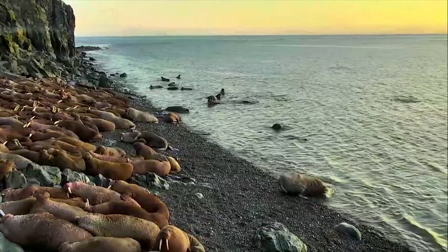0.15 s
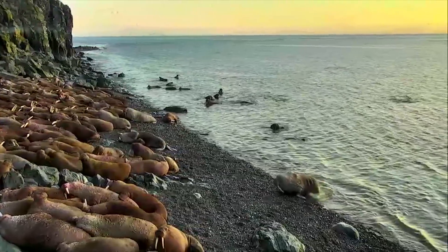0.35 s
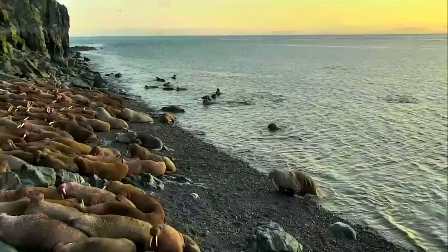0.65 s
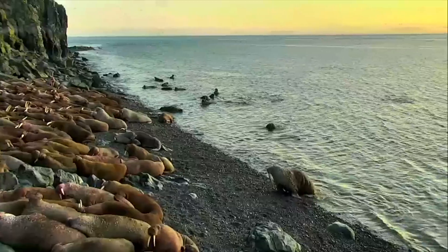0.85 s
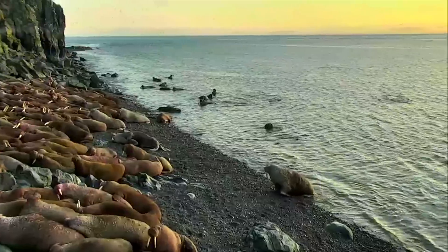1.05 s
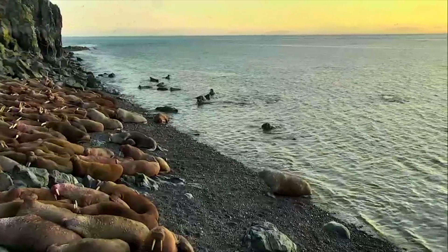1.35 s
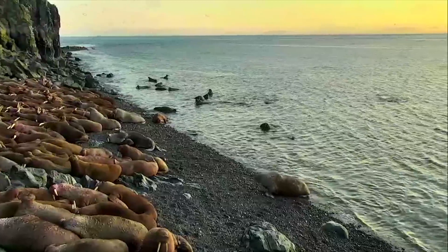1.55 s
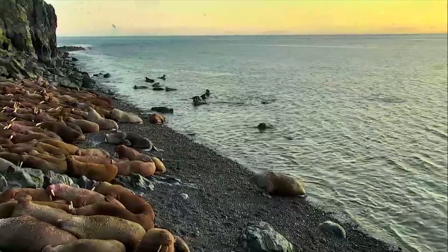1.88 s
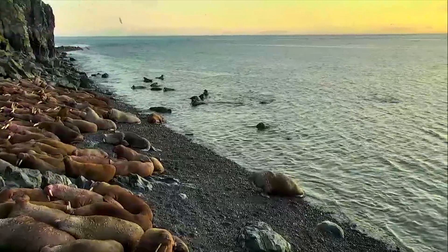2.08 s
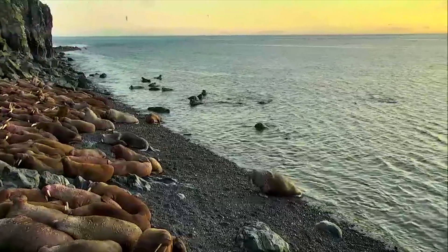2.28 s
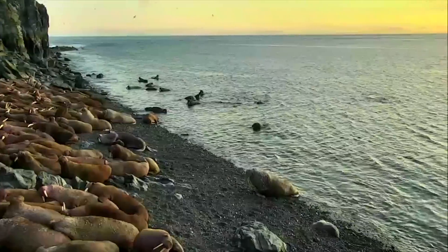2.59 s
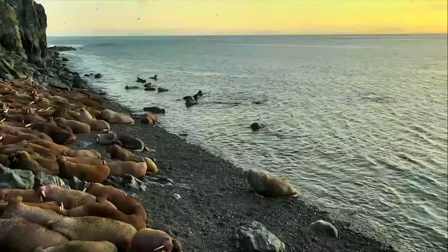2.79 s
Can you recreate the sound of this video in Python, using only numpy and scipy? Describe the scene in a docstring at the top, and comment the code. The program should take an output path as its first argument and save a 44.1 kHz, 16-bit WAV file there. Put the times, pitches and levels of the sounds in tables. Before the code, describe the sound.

A walrus gives a rough, throaty roar that clears into a falling note, then a wet fluttering snort and low grunts, echoing off a cliff, over small surf on pebbles and wind bumping the microphone.

```python
"""Small surf hisses on pebbles, with a short moan and the end of a hoarse far-off call, as wind bumps the microphone.
Then a walrus roars: rough vocal-fold pulses and puffs of air ring its throat, and one harmonic clears into a falling note.
A fluttering snort follows: spits of spray and pushes of air, with overload clicks, trailing off in a hollow rush.
Low fluttering grunts, a growl of slow puffs, blows of air and knocking pebbles fill the rest.
A cliff throws the calls back as scattered, decaying echoes."""
import sys
import numpy as np
from scipy import signal
from scipy.fft import rfft, irfft
from scipy.io import wavfile
from scipy.ndimage import uniform_filter1d

SR = 44100
rng = np.random.default_rng(int(sys.argv[2]) if len(sys.argv) > 2 else 0)


def output_pcm(signal):
    """Save a mono or channel-first signal as 16-bit PCM at the path in sys.argv[1].

    Samples are clipped to [-1, 1] before scaling.
    """
    pcm = np.clip(np.atleast_2d(signal).T, -1, 1) * 32767
    wavfile.write(sys.argv[1], SR, np.round(pcm).astype(np.int16))


N = 129213  # samples
T = np.arange(N) / SR  # s
BINS_HZ = np.fft.rfftfreq(N, 1 / SR)


def amp(db):
    """Decibels to gain."""
    return 10 ** (np.asarray(db) / 20)


def unit(x):
    """Scales to rms 1."""
    return x / np.sqrt(np.mean(x ** 2) + 1e-20)


def curve(points):
    """Straight lines through (t/s, value) points."""
    return np.interp(T, *np.transpose(points))


def level(points):
    """Gain from (t/s, level/dB) points, silent outside them."""
    return amp(np.interp(T, *np.transpose(points), left=-np.inf, right=-np.inf))


def read(points, hz):
    """Reads a (f/Hz, value) table on a log-frequency axis."""
    f, value = np.transpose(points)
    return np.interp(np.log(hz + 1), np.log(f), value)


def noise(spectrum):
    """Steady noise coloured by a (f/Hz, level/dB) table, at rms 1."""
    white = rfft(rng.standard_normal(N))
    return unit(irfft(white * amp(read(spectrum, BINS_HZ)), N))


def wobble(hz):
    """Random drift of rms 1 that moves no faster than about the given rate."""
    white = rfft(rng.standard_normal(N))
    return unit(irfft(white / (1 + (BINS_HZ / hz) ** 4), N))


def turns_of(hz):
    """Running count of cycles at a fixed or moving frequency."""
    return np.cumsum(hz) / SR


def resonate(x, hz, width):
    """A steep resonance of gain 1, fixed or moving: shift down to 0 Hz, smooth twice, shift back."""
    turn = np.exp(2j * np.pi * turns_of(hz * np.ones(N)))
    r = np.exp(-np.pi * width / SR)
    smooth = signal.lfilter([(1 - r) ** 2], [1, -2 * r, r * r], x / turn + 1e-18)
    return 2 * (turn * smooth).real


def tract(x, resonances):
    """Rings a sound through parallel (f/Hz, width/Hz, level/dB) resonances of alternating sign, at rms 1."""
    return unit(sum((-1) ** k * amp(db) * resonate(x, f, width)
                    for k, (f, width, db) in enumerate(resonances)))


def swell(s, rise, fall):
    """A bell-shaped rise and fall that peaks at one moment."""
    return np.exp(-.5 * ((T - s) / np.where(T < s, rise, fall)) ** 2)


# colour of the wind rumble: f/Hz, level/dB
WIND_COLOUR = [(10, -19), (25, 5), (45, 4), (70, 11), (115, 3), (170, 1.5), (300, -23.5), (1000, -67.5)]
# gusts bumping the microphone: peak t/s, rise/s, fall/s, level/dB
WIND_GUSTS = [(.93, 0.02, 0.14, -39.5), (1.33, 0.08, 0.12, -33), (2.034, 0.014, 0.017, -36),
              (2.16, 0.061, 0.072, -34), (2.84, 0.027, 0.032, -41)]
WIND_BED_DB = -49


def wind():
    """Low lumps of air push on the microphone, over a faint steady rumble."""
    gusts = sum(amp(db) * swell(s, rise, fall) for s, rise, fall, db in WIND_GUSTS)
    return noise(WIND_COLOUR) * (amp(WIND_BED_DB) + gusts)


# colour laid on the wash: f/Hz, level/dB
SURF_COLOUR = [(59, -28), (100, -3), (146, 1.5), (215, -6.5), (380, -7), (772, -18), (1300, -12.5),
               (1650, -16), (2200, -8), (3900, -13.5), (5100, -36.5), (10500, -73)]
# ebb and flow of the wash: t/s, level/dB
SURF_LEVEL = [(0, -35.5), (.6, -32), (1, -35.5), (1.5, -31.5), (2.35, -35.5), (2.93, -34)]
GRAINS_PER_S, PATCH_DB = 1500, 1.5


def surf(size=512):
    """Patchy wash: noise plus random grains of rolling pebbles and droplets, uneven over time and pitch."""
    struck = rng.random(N) < GRAINS_PER_S / SR
    grains = amp(3.1 * np.minimum(rng.exponential(1, N), 4)) * rng.standard_normal(N) * struck
    _, _, z = signal.stft(rng.standard_normal(N) + 0.57 * unit(grains), SR, nperseg=size)
    across_pitch = uniform_filter1d(rng.standard_normal(z.shape), size=6, axis=0)
    patches = unit(uniform_filter1d(across_pitch, size=8, axis=1))
    wash = signal.istft(z * amp(PATCH_DB * patches), SR, nperseg=size)[1][:N]
    low_cut = BINS_HZ ** 2 / (BINS_HZ ** 2 + 70 ** 2)
    return level(SURF_LEVEL) * unit(irfft(rfft(wash) * amp(read(SURF_COLOUR, BINS_HZ)) * low_cut, N))


# time each band of the echo takes to drop 60 dB: f/Hz, decay/s
CLIFF_DECAY = [(100, 0.56), (500, 1), (2000, 0.5), (6000, .3)]
CLIFF_DB = -11.5
ECHOES_PER_S, CLIFF_BUILD_S = 2000, 0.0064


def cliff(x, size=256):
    """Scattered echoes from the rock, each band dying at its own speed."""
    echoes = rng.standard_normal(SR) * (rng.random(SR) < ECHOES_PER_S / SR)
    hz, t, z = signal.stft(echoes, SR, nperseg=size)
    decay = np.exp(-np.log(1000) * t / read(CLIFF_DECAY, hz)[:, None])
    tail = signal.istft(z * decay * np.minimum(t / CLIFF_BUILD_S, 1), SR, nperseg=size)[1]
    return signal.fftconvolve(x, tail / np.linalg.norm(tail))[:N]


# hoarse voices of the distant herd: start t/s, length/s, f/Hz, width/Hz, level/dB
HERD_CALLS = [(-.3, 0.49, 392, 50, -42.5), (1.504, 1.18, 405.5, 40, -45), (2.16, 0.11, 3450, 350, -44)]


def herd():
    """Distant hoarse calls swell and fade, each as breath noise in one resonance."""
    out = np.zeros(N)
    for s, length, hz, width, db in HERD_CALLS:
        arch = np.sqrt(abs(np.sin(np.pi * np.clip((T - s) / length, 0, 1))))
        out += amp(db) * arch * unit(resonate(rng.standard_normal(N), hz, width))
    return out


# short clear moans from farther back: peak t/s, rise/s, fall/s, f/Hz at the peak, glide/(Hz per s), level/dB
HERD_MOANS = [(0.029, 0.031, 0.029, 234, 1, -42), (.965, 0.029, 0.044, 418, -180, -33.5),
              (1.63, 0.047, 0.022, 345, 704, -37.5)]


def moans():
    """Smooth gliding voices of farther animals, as slightly unsteady sines."""
    out = np.zeros(N)
    for s, rise, fall, hz, glide, db in HERD_MOANS:
        pitch = (hz + glide * (T - s)) * (1 + 0.021 * wobble(55))
        out += amp(db) * swell(s, rise, fall) * unit(np.sin(2 * np.pi * turns_of(pitch)))
    return out


# pebbles knocking under the animals: peak t/s, f/Hz, level/dB
PEBBLE_KNOCKS = [(1.894, 1315, -29.5), (2.456, 960, -33), (2.557, 2110, -29.5), (2.6003, 2400, -28)]
KNOCK_RISE_S, KNOCK_FALL_S, KNOCK_WIDTH_HZ = 0.00031, 0.0036, 510


def knocks():
    """Stones grate together in short, dull clacks of resonant noise."""
    return sum(amp(db) * swell(s, KNOCK_RISE_S, KNOCK_FALL_S)
               * unit(resonate(rng.standard_normal(N), hz, KNOCK_WIDTH_HZ))
               for s, hz, db in PEBBLE_KNOCKS)


# colour of blown air and spray, also used by the snort: f/Hz, level/dB
SPRAY_COLOUR = [(200, 2.5), (700, -17), (1250, 7), (1700, -8.5), (2200, 7), (3300, 5), (4100, -0.5),
                (5000, -15.5), (7000, -34), (10000, -45)]
# blasts of air: peak t/s, rise/s, fall/s, hiss level/dB, airway level/dB, airway f/Hz
AIR_BLASTS = [(1.34, 0.054, 0.075, -33.5, -29.5, 220), (2.564, 0.026, 0.055, -36, -38, 288)]
BLOW_WIDTH = 1  # width of each of the two airway passes as a share of its frequency


def blows():
    """Walruses blow: a hiss of air over one broad, steep-sided airway resonance."""
    out = np.zeros(N)
    for s, rise, fall, hiss_db, body_db, hz in AIR_BLASTS:
        once = resonate(rng.standard_normal(N), hz, hz * BLOW_WIDTH)
        body = unit(resonate(once, hz, hz * BLOW_WIDTH))
        out += swell(s, rise, fall) * (amp(hiss_db) * noise(SPRAY_COLOUR) + amp(body_db) * body)
    return out


# gritty growl leading into the last grunt: t/s, level/dB
GROWL_LEVEL = [(2.3, -46), (2.41, -42.5), (2.437, -33), (2.57, -44)]
# resonances of the open throat: f/Hz, width/Hz, level/dB
GROWL_THROAT = [(906, 290, -0.5), (1343, 140, 0), (1880, 150, 0), (2510, 680, -5)]
GROWL_HZ = 61.54  # mean rate of the puffs


def growl():
    """Slow, uneven puffs of noise ring a wide-open throat."""
    turns = turns_of(GROWL_HZ * (1 + .2 * wobble(40)))
    puffs = np.exp(-(turns % 1) / .2) * rng.standard_normal(N)
    return level(GROWL_LEVEL) * tract(puffs, GROWL_THROAT)


# low grunts, one list each: t/s, f/Hz, level/dB, flutter depth
GRUNT_PATHS = [
    [(1.55, 170.2, -48.5, .5), (1.70, 163.1, -37, 0.54), (1.78, 161.5, -29, 0.18), (1.815, 151.8, -24, .3),
     (1.83, 174.5, -37, 1.3), (1.91, 186.9, -30.5, 0.61), (1.94, 189.7, -26.5, 0.96),
     (2.0, 186.5, -30, 1.4), (2.07, 179.6, -33, 0.88), (2.13, 164.8, -43, .6), (2.22, 171, -54, .6)],
    [(2.47, 156.5, -52, .4), (2.535, 150.3, -34, 0.54), (2.605, 158.6, -38.5, 0.5), (2.65, 171, -44.5, .4),
     (2.75, 167, -71, 0.44)],
]
# colour of their hoarseness: f/Hz, level/dB
HOARSE_COLOUR = [(60, -15), (130, -2.5), (220, 3), (300, -12), (650, -7), (900, -28), (3000, -38), (6000, -78)]
GRUNT_FLUTTER_HZ, GRUNT_JITTER = 33, .04  # mean flutter rate; pitch jitter as a share
GRUNT_OVERTONE_DB, GRUNT_HOARSE_DB = -25.5, -10  # against the fundamental and the voice


def grunt(points):
    """A deep, nearly pure voice that breaks into a strong flutter, with some hoarseness."""
    s, hz, db, depth = np.transpose(points)
    turns = turns_of(np.interp(T, s, hz) * (1 + GRUNT_JITTER * wobble(70.5)))
    depth = np.interp(T, s, depth)
    flutter = 1 + depth * np.sin(2 * np.pi * turns_of(GRUNT_FLUTTER_HZ * (1 + .1 * wobble(23))))
    flutter /= np.sqrt(1 + depth ** 2 / 2)  # deep flutter gets no louder
    overtone = amp(GRUNT_OVERTONE_DB) * np.sin(2 * np.pi * 2 * turns)
    voice = unit(flutter * (np.sin(2 * np.pi * turns) + overtone))
    return level(np.c_[s, db]) * (voice + amp(GRUNT_HOARSE_DB) * noise(HOARSE_COLOUR))


# the rush of air that ends the snort: t/s, level/dB
RUSH_LEVEL = [(1.24, -54), (1.30, -36.5), (1.41, -33.5), (1.48, -39.5), (1.7, -39), (1.87, -36),
              (1.98, -43.5), (2.12, -57)]
# resonances of its hollow airway: f/Hz, width/Hz, level/dB
RUSH_AIRWAY = [(1146, 104, -2.5), (1324, 80, -1.5), (2460, 94, 1), (2830, 270, -3.5)]


def rush():
    """The snorting walrus lets out the rest of its air, unevenly, through a ringing airway."""
    air = rng.standard_normal(N) * (1 + 0.39 * wobble(36))
    return level(RUSH_LEVEL) * tract(air, RUSH_AIRWAY)


# flaps of nostrils and lips: t/s, spray rise and fall/s, spray level/dB, spray f/Hz, click level/dB, push level/dB
SNORT_FLAPS = [(1.302, 0.0056, -24.5, 2760, -34.5, -28), (1.32, .0025, -25.5, 3200, -40, -20.5),
               (1.3374, .004, -25, 2910, -44.5, -23), (1.3555, 0.0043, -30, 2370, -35.5, -19.5),
               (1.376, 0.0016, -23.5, 2700, -50.5, -37), (1.4023, .004, -24.5, 2450, -45, -23)]
# colour of the overload click: f/Hz, level/dB
CLICK_COLOUR = [(500, -2), (4000, -1.5), (5800, -6), (8000, -16), (10500, -29)]
SPRAY_WIDTH_HZ, CLICK_S = 3000, 0.00023
PUSH_HZ, PUSH_RISE_S, PUSH_FALL_S = 132, 0.0042, 0.0023


def snort():
    """Each flap spits spray and pushes low air, with a sharp click of the overloaded recorder."""
    spray, click = noise(SPRAY_COLOUR), noise(CLICK_COLOUR)
    out = np.zeros(N)
    for s, length, spray_db, hz, click_db, push_db in SNORT_FLAPS:
        push = np.cos(2 * np.pi * PUSH_HZ * (T - s))
        out += amp(spray_db) * swell(s, length, length) * unit(resonate(spray, hz, SPRAY_WIDTH_HZ))
        out += amp(click_db) * swell(s, CLICK_S, CLICK_S) * click
        out += amp(push_db) * swell(s, PUSH_RISE_S, PUSH_FALL_S) * push
    return out


def folds(turns, count, order):
    """Pulses of the vocal folds as a sum of harmonics, all but the one that rings as the clear note."""
    return unit(sum(np.cos(2 * np.pi * k * turns) for k in range(1, count + 1) if k != order))


# pitch of the roar: t/s, f/Hz
ROAR_PITCH = [(.15, 142), (.3, 138.9), (.45, 132.2), (.55, 134.1), (.63, 131.9), (.70, 134), (.765, 134.1),
              (.80, 131.7), (.85, 125.9), (.92, 119.3), (1.15, 111.2)]
# effort of the roar: t/s, level/dB
ROAR_LEVEL = [(.12, -52), (.2, -40.5), (.245, -33), (.42, -25.5), (.58, -29.5), (.67, -31.5), (.71, -29.5),
              (.82, -31), (.92, -29), (1.0, -38), (1.1, -36), (1.18, -78)]
# share of puffs against clean pulses: t/s, roughness 0-1
ROUGHNESS = [(.2, 0.78), (.42, 0.74), (.56, 0.68), (.8, 0.64), (.98, 0.95)]
# clear note that the throat picks out: t/s, level/dB
NOTE_LEVEL = [(.42, -50), (.49, -33), (.55, -27), (.63, -28), (.675, -44), (.70, -25), (.725, -29),
              (.77, -22.5), (.80, -21), (.84, -29), (.91, -31), (.95, -52)]
# throat resonances: f/Hz, width/Hz, level/dB
ROAR_THROAT = [(134.3, 62, -8), (266, 59, -11), (381, 114, 2), (580, 70, -2.5), (677, 73, -5),
               (892, 104, -3), (1143, 160, -9), (1588, 128, -10), (1840, 190, -16), (2306, 180, -14.5),
               (2990, 150, -10.5), (3343, 155, -11), (3930, 60, -20.5)]
# airy mouth resonances: f/Hz before the mouth scales it, width/Hz, level/dB
MOUTH_AIR = [(4510, 120, -23), (6030, 120, -42.5)]
# closing mouth that sinks them: t/s, share of their frequency
MOUTH_CLOSING = [(.48, 0.98), (.66, .96)]
# resonances rung in turn as the mouth changes shape: peak t/s, fall/s (rise is half), f/Hz, width/Hz, level/dB
MOUTH_SHAPES = [(0.258, 0.064, 340, 200, -33.5), (0.266, 0.097, 1213, 222, -33.5),
                (0.469, 0.067, 599.4, 48.6, -30), (0.527, 0.063, 3400, 200, -36)]
# colour of the rasp: f/Hz, level/dB
RASP_COLOUR = [(200, -12.0), (700, -5), (2000, 0), (4100, -4), (5200, -18.5), (7000, -27.5), (10000, -41)]
RASP_DB = -23.5  # against the throat
NOTE_JITTER, NOTE_SHIMMER = .005, .1  # unsteadiness of pitch and of level, as shares


def roar(order=3):
    """Uneven pulses and puffs of air pass the throat; one harmonic rings clear on its main resonance."""
    hz, rough = curve(ROAR_PITCH), np.clip(curve(ROUGHNESS), 0, 1)
    turns = turns_of(hz * (1 + 0.0305 * wobble(72.3)))
    puffs = unit((0.45 + np.exp(-(turns % 1) / 0.76)) * rng.standard_normal(N))
    pulses = folds(turns, count=32, order=order)
    drive = unit(((1 - rough) * pulses + rough * puffs) * (1 + 0.24 * wobble(74)))
    throat = tract(drive, ROAR_THROAT)
    airy = sum(amp(db) * unit(resonate(puffs, f * curve(MOUTH_CLOSING), width))
               for f, width, db in MOUTH_AIR)
    rasp = amp(RASP_DB) * noise(RASP_COLOUR)
    shapes = sum(amp(db) * swell(s, length / 2, length) * unit(resonate(puffs, f, width))
                 for s, length, f, width, db in MOUTH_SHAPES)
    hoarse = level(ROAR_LEVEL) * (throat + airy + rasp) + shapes
    note_turns = order * turns_of(hz * (1 + NOTE_JITTER * wobble(46)))
    note = unit(np.sin(2 * np.pi * note_turns) * (1 + NOTE_SHIMMER * wobble(60)))
    return hoarse, level(NOTE_LEVEL) * note


def scene():
    """Calls, knocks and their echo over the distant herd, surf and wind."""
    hoarse, note = roar()
    grunts = sum(grunt(path) for path in GRUNT_PATHS)
    calls = hoarse + grunts + moans() + snort() + rush() + growl() + blows() + knocks()
    echo = amp(CLIFF_DB) * cliff(calls + .5 * note)  # the note goes to the cliff at half strength
    return (calls + note + echo + herd() + surf() + wind())[None]


EDGE_HZ = 10600


def record(dry):
    """The band limit of the recorder: a steep low-pass."""
    low_pass = signal.firwin(255, EDGE_HZ, window=("kaiser", 9), fs=SR)
    return signal.oaconvolve(dry, low_pass[None], "same")


dry = scene()
out = record(dry)
output_pcm(out)
```